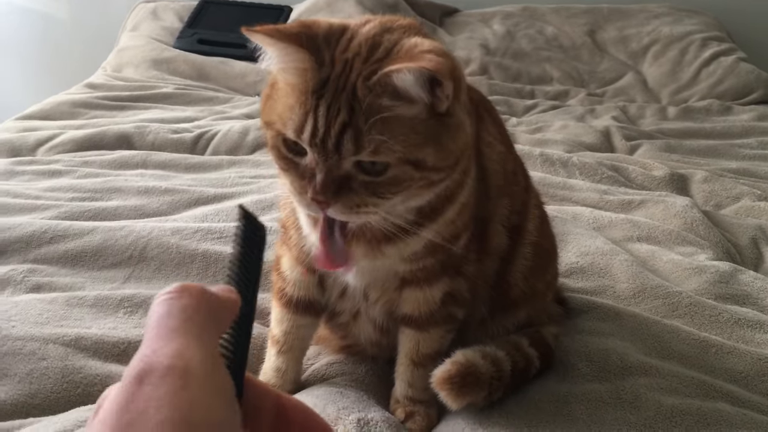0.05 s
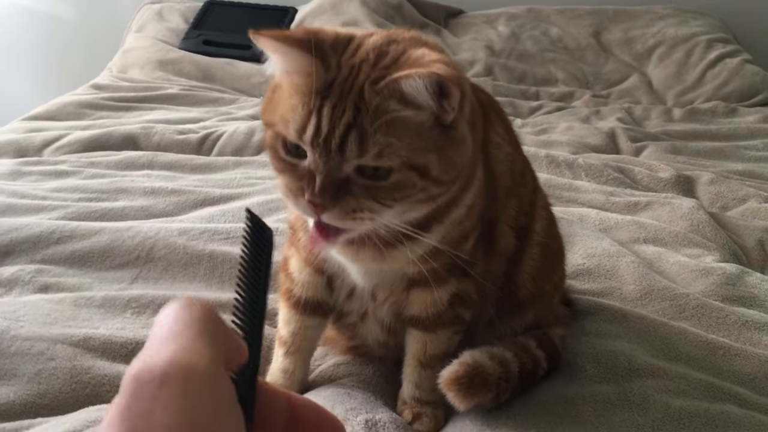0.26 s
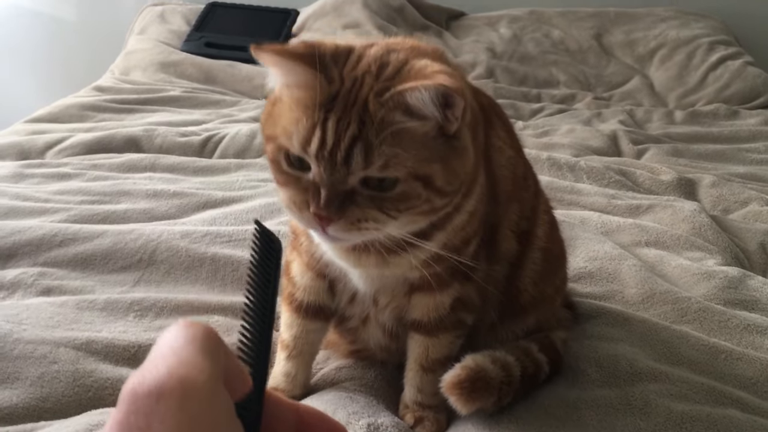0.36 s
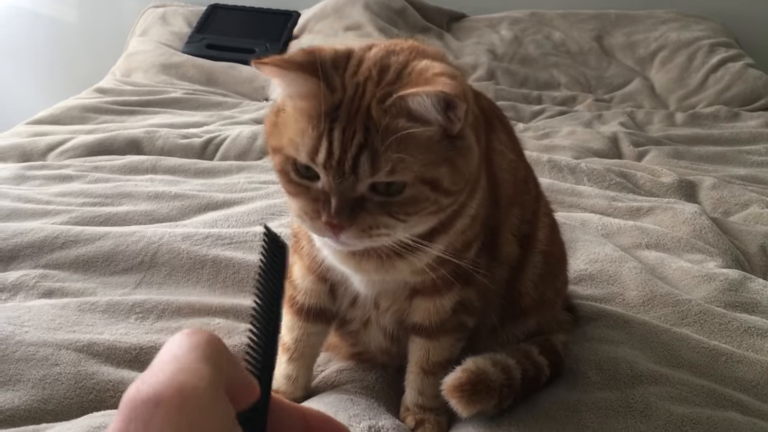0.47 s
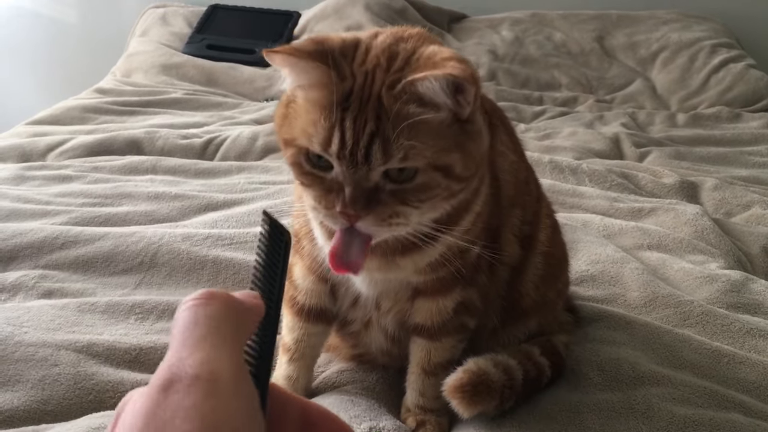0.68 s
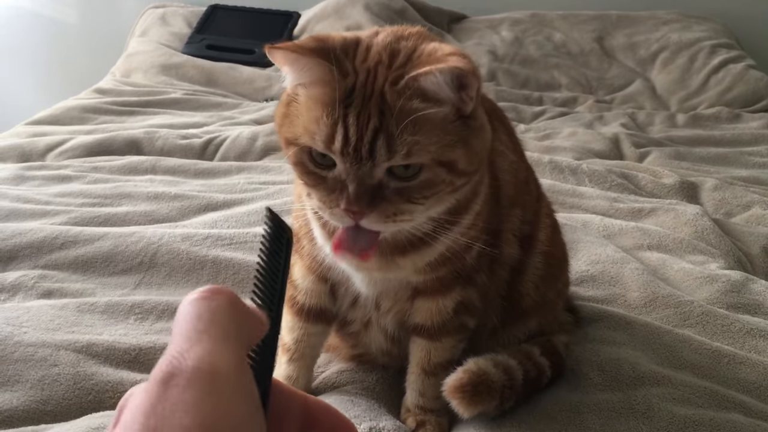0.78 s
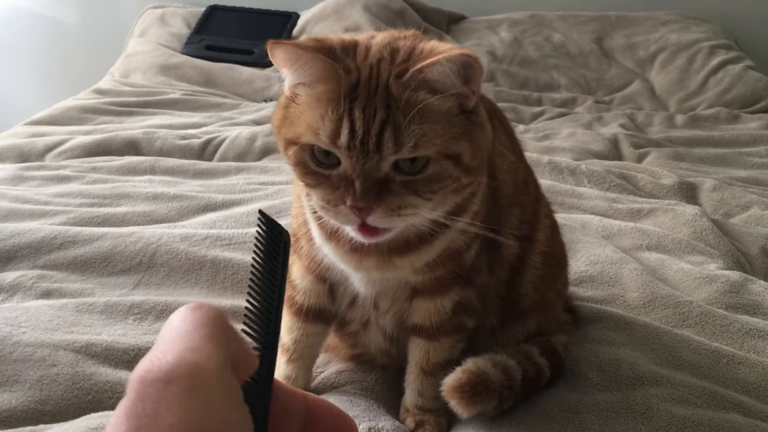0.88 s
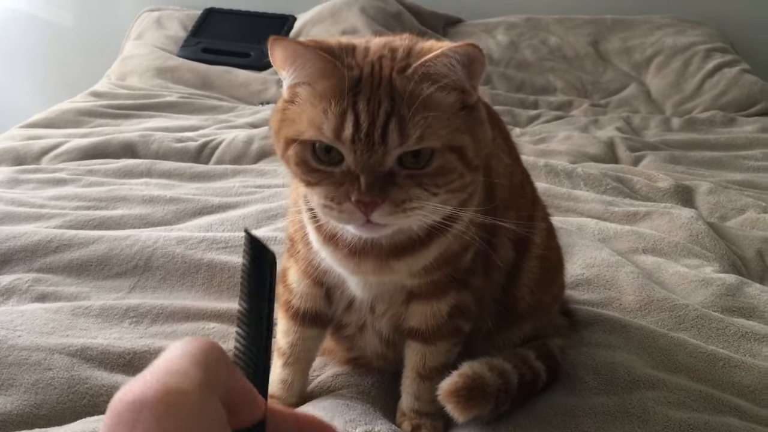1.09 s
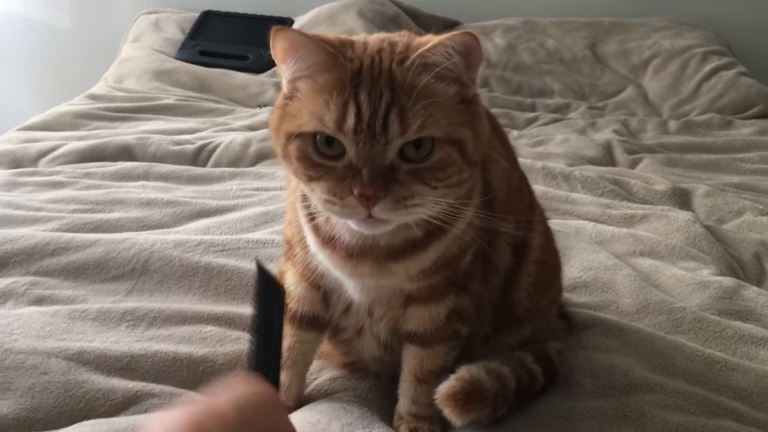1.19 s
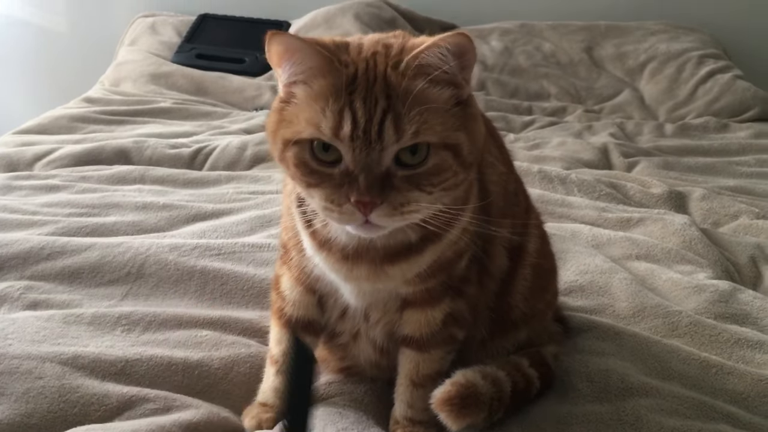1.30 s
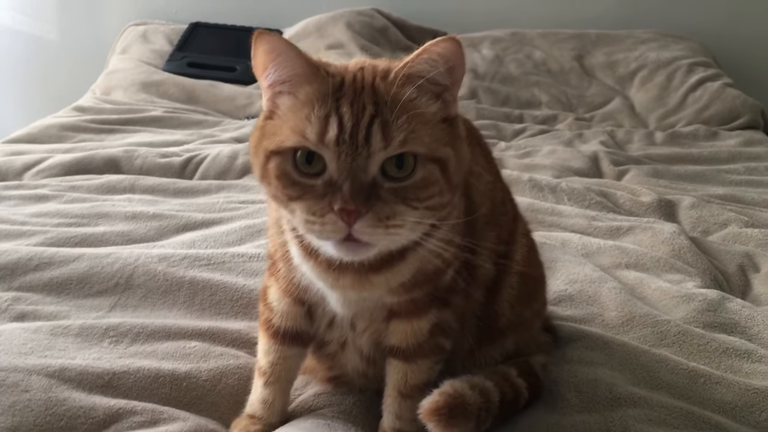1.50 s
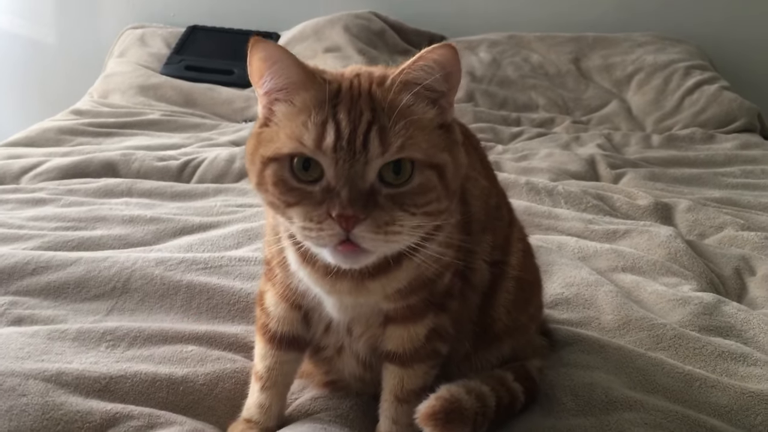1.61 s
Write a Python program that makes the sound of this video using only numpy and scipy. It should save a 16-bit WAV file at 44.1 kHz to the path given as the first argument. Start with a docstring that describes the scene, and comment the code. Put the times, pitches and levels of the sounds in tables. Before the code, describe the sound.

A thumb strums a plastic comb's teeth in two quick runs of sharp clicks.

```python
"""A plastic comb clicks as a thumb drags twice along its teeth, close to a phone in a quiet bedroom.
Each tooth snaps free, rings for a few milliseconds and knocks the comb's spine. The thumbnail ticks
between teeth, and the comb knocks and scuffs in the hand. Walls and ceiling return each click.
The room's air murmurs underneath, and the phone's noise suppressor lets hiss up while the comb sounds."""
import sys
import numpy as np
from scipy import signal
from scipy.fft import rfft, irfft
from scipy.io import wavfile
from scipy.ndimage import uniform_filter1d

SR = 44100
rng = np.random.default_rng(int(sys.argv[2]) if len(sys.argv) > 2 else 0)


def store_wav(level_fs):
    """Save 16-bit WAV to argv[1]."""
    pcm = np.round(np.clip(np.atleast_2d(level_fs), -1, 1) * 32767)
    wavfile.write(sys.argv[1], SR, pcm.T.astype(np.int16))


N = 72765
CONTACT_TIME = np.arange(2048) / SR  # seconds since a touch began
CRACK_DB, CRACK_T60_S = -18, 0.005  # a snap's toneless part; "t60" is the time to fade by 60 dB

# the tones of the comb when held tight: (pitch [Hz], level [dB], fade time [s])
GRIP_TONES = [(2060, 0, .0075), (2950, -2, .005), (4300, -5, .003)]


def undb(db):
    """Turn decibels into a volume multiplier."""
    return 10 ** (np.asarray(db) / 20)


def fade(t, t60):
    """Die away by 60 dB every t60 seconds."""
    return np.exp(-np.log(1000) * t / t60)


def colour(x, points):
    """Turn pitches up or down along a curve of (pitch [Hz], level [dB]) points."""
    hz, db = np.array(points, float).T
    size = 2 * len(x)
    f = np.maximum(np.fft.rfftfreq(size, 1 / SR), 1)
    gain = undb(np.interp(np.log(f), np.log(hz), db))
    return irfft(rfft(x, size) * gain, size)[:len(x)]


def noise(points, db):
    """Steady noise, shaped by the points, with an average level of db."""
    x = colour(rng.standard_normal(N), points)
    return x * undb(db) / x.std()


def add(out, start, x):
    """Mix x into out from the start time in seconds."""
    i = int(start * SR)
    out[i:i + len(x)] += x[:N - i]


def snap(t60):
    """A brief, random chatter of contact, about equally strong at all pitches."""
    burst = rng.standard_normal(len(CONTACT_TIME)) * fade(CONTACT_TIME, t60)
    for _ in range(3):  # even out the pitches, then make it short again
        spectrum = rfft(burst)
        burst = irfft(spectrum / (abs(spectrum) + 1e-9)) * fade(CONTACT_TIME, 4 * t60)
    return burst / np.sqrt(np.sum(burst ** 2))


def ring(tones, push, floor_db=-60, dips=()):
    """A push makes the plastic ring at its own tones, over a toneless floor of sound."""
    size = 4096
    f = np.fft.rfftfreq(size, 1 / SR)
    power = undb(floor_db) ** 2
    for hz, db, t60 in tones:
        strength = undb(db + .8 * rng.standard_normal()) * SR / 2  # no two blows are alike
        pitch = hz * (1 + .015 * rng.standard_normal())
        damping = np.log(1000) / t60
        power += strength ** 2 / (damping ** 2 + (2 * np.pi * (f - pitch)) ** 2)
    for hz, width, depth_db in dips:
        power *= undb(-depth_db * np.exp(-((f - hz) / width) ** 2)) ** 2
    # pack the sound toward its start, like a real blow (minimum phase)
    cepstrum = irfft(np.log(power) / 2)
    cepstrum[1:size // 2] *= 2
    cepstrum[size // 2:] = 0
    return irfft(np.exp(rfft(cepstrum)) * rfft(push, size))


def room_air():
    """The air of the room murmurs, low and steady."""
    # the murmur's shape: (pitch [Hz], relative level [dB])
    murmur = [(25, -29), (40, -10), (58, -4), (100, -3.5), (128, 1), (170, -7.5), (230, -7.5), (330, -14),
              (510, -19.5), (600, -13.5), (720, -26.5), (1100, -28), (2500, -32.5), (4000, -31),
              (8000, -36)]
    return noise(murmur, db=-57.5)


def microphone_hiss(sound):
    """The noise suppressor holds the hiss down, and lets it up for a moment after each loud click."""
    # the hiss's shape: (pitch [Hz], relative level [dB])
    hiss = [(100, -14), (600, 4.5), (1500, 2), (3000, 1.5), (6000, -1.5), (10000, 0.5), (15500, -0.5)]
    trigger_db, shut_db, hold_s, glide_s = -27, -10.5, .335, .02
    index = np.arange(N)
    last_loud = np.maximum.accumulate(np.where(abs(sound) > undb(trigger_db), index, -N))
    is_open = index - last_loud < hold_s * SR
    openness = uniform_filter1d(is_open.astype(float), int(glide_s * SR))
    return noise(hiss, db=-61) * undb(shut_db * (1 - openness))


def bedroom(sound):
    """Walls and ceiling return a few clear echoes and a short wash whose treble dies first."""
    # the first echoes: (delay [s], level [dB])
    echoes = [(.0075, -32), (.0101, -25), (.0112, -25.5), (.0127, -22.5), (.0136, -36), (.0145, -23),
              (.0163, -29.5), (.0179, -23.5)]
    # how the room colours the wash: (pitch [Hz], boost [dB])
    room_colour = [(500, -9), (1300, 0), (1600, 0.5), (2200, -1.5), (3400, -10.5), (4600, -3), (5500, -4.5),
                   (6300, 1), (8200, -5), (10000, 1.5), (12200, -1), (13300, 0.5), (14500, -1.5),
                   (16000, -21)]
    wash_db, onset_s, treble_hz = -12, 0.0075, 9600
    t = np.arange(SR // 2) / SR
    scatter = rng.standard_normal(len(t))
    low = signal.sosfilt(signal.butter(1, treble_hz, fs=SR, output="sos"), scatter)
    wash = low * fade(t, t60=0.4) + (scatter - low) * fade(t, t60=.22)
    wash *= np.clip(2 * t / onset_s - 1, 0, 1)
    response = colour(wash * undb(wash_db) / np.sqrt(np.sum(wash ** 2)), room_colour)
    for delay, db in echoes:
        response[int(delay * SR)] += undb(db)
    return signal.fftconvolve(sound, response)[:N]


def grip_rubs():
    """The comb slides in the hand, and a swell of friction makes it ring."""
    # the slides: (time [s], length [s], level [dB])
    rubs = [(0.58, 0.013, -51.5), (1.223, 0.028, -61.5), (1.259, 0.021, -62)]
    out = np.zeros(N)
    for start, length, db in rubs:
        swell = np.sin(np.pi * np.clip(CONTACT_TIME / length, 0, 1))
        friction = ring(GRIP_TONES, rng.standard_normal(len(swell)) * swell)
        average = np.sqrt(np.sum(friction ** 2) / (length * SR))
        add(out, start, undb(db) * friction / average)
    return out


def grip_knocks():
    """The comb knocks softly as it shifts in the hand."""
    # the knocks: (time [s], level [dB])
    knocks = [(.5843, -35), (.5856, -36), (1.2452, -43.5)]
    out = np.zeros(N)
    for start, db in knocks:
        add(out, start, undb(db) * ring(GRIP_TONES, snap(CRACK_T60_S)))
    return out


def comb_tones(treble_db, top_db):
    """The whole comb's tones; a sharper release makes the high ones stronger."""
    # the comb's natural tones: (pitch [Hz], level [dB], fade time [s])
    tones = [(1220, -43.5, 0.0089), (2236, -40.5, 0.0061), (3170, -37, 0.0051), (4270, -33.5, 0.0045),
             (5160, -29.5, 0.003), (6640, -30, 0.0039), (8100, -29, 0.0031), (9630, -33, 0.0056),
             (11170, -31.5, 0.0039), (12880, -29.5, 0.0042), (14500, -29.5, 0.0039), (15760, -30, 0.003)]
    corners_hz, boosts_db = [4400, 8800, 13000], [0, treble_db, top_db]
    return [(hz, db + np.interp(hz, corners_hz, boosts_db), t60) for hz, db, t60 in tones]


def light_ticks():
    """A very faint, bright tick sounds before the strokes begin; the later ticks are the nail tapping lightly
    on the teeth and ringing the comb."""
    # the ticks: (time [s], relative level [dB], top treble boost [dB]); the first is a faint, bright tick, the
    # rest are nail taps
    ticks = [(0.132, -30.5, 9), (0.1461, -33, -4), (0.1832, -20.5, -18), (0.2243, -30, -5),
             (0.2683, -16, -11), (0.5753, -11, -17), (0.812, -15.5, -4.0), (0.837, -18, -2),
             (0.8426, -15.5, -10.0), (0.8516, -21, -2), (1.262, -23.5, -3), (1.2717, -23.0, -3),
             (1.3426, -27, 0)]
    out = np.zeros(N)
    for start, db, top_db in ticks:
        tick = ring(comb_tones(top_db / 2, top_db), snap(t60=0.0083), CRACK_DB)
        add(out, start, undb(db + 5.5) * tick)
    return out


def tooth_snaps():
    """Each tooth snaps free, rings, knocks the spine and sets the whole comb ringing."""
    # one row per snap: (time [s], level [dB], spine pitch [Hz], bending pitch [Hz], bending boost [dB],
    # tooth pitch [Hz], tooth boost [dB], overtone pitch [Hz], treble boost [dB], top treble boost [dB])
    plucks = [(0.1998, -16, 1520, 3360, 9, 6250, -13, 13300, 2, 2.5),
              (0.2264, -1.1, 1580, 3780, 3, 7030, 3.5, 15600, -1, 2),
              (0.2709, -1.5, 1550, 3770, -0.5, 6770, 4.5, 13400, -19, 2),
              (0.31, 0.5, 1570, 3450, 2.5, 6430, 5.5, 12800, -15, 4.5),
              (0.3388, -1, 1590, 3640, -1, 5630, 7.5, 12400, -12, 2.5),
              (0.3609, 0.1, 1500, 3500, 4, 5650, 4.5, 13500, 0.5, 4),
              (0.4033, 1.1, 1510, 3540, 0.5, 5600, 5, 12500, -8, 3),
              (0.4532, 0.4, 1470, 3650, 2.5, 5530, 9.5, 13600, 2, 6.5),
              (0.491, 2, 1430, 3600, -1.5, 5400, 3, 14800, -1.5, 4.5),
              (0.5579, -1, 1380, 3450, -18, 6600, 4, 14500, 2, 6.5),
              (0.8289, -17, 1500, 3450, 8, 6350, -4, 13200, 6, 3),
              (0.8535, -3.5, 1490, 3730, -1.5, 7280, -17, 13500, -3, 3.5),
              (0.8917, -0.6, 1530, 3870, 0.5, 6600, 5.5, 13200, -26, 3),
              (0.9131, 0.2, 1610, 3080, 5, 6300, 4, 13140, -10, 3),
              (0.9463, 1, 1590, 3580, 3, 6450, -13, 13300, 0.5, 3),
              (0.9714, 2.5, 1500, 3550, 1.5, 8270, 6, 13100, -0.5, 4),
              (1.0042, 3.5, 1480, 3360, -1.5, 5700, 2, 12900, -9, 2.5),
              (1.0289, 1.6, 1500, 3970, -1, 8400, 2, 13450, 5, 6),
              (1.0582, 2.5, 1330, 3750, -4, 8250, 1.5, 13200, -2, 2.5),
              (1.087, 0.5, 1320, 3780, -9, 5400, 8, 13500, 3.5, 4),
              (1.1087, 2, 1440, 3530, -4, 5400, 7.5, 13700, -1, 3.5),
              (1.1259, 0, 1410, 3600, 0, 5870, 8, 13900, 2.5, 6.5)]
    # gaps where neighbouring tones cancel: (pitch [Hz], width [Hz], depth [dB])
    dips = [(1850, 160, 4), (2700, 220, 5), (4500, 350, 4), (10400, 400, 3)]
    out = np.zeros(N)
    for start, db, spine_hz, bend_hz, bend_db, tooth_hz, tooth_db, over_hz, treble_db, top_db in plucks:
        # (pitch [Hz], level [dB], fade time [s])
        own_tones = [(spine_hz, -36.5, .0135), (bend_hz, bend_db - 29, .0045),
                     (tooth_hz, tooth_db - 30.5, .0042), (over_hz, top_db - 25, .0038)]
        click = ring(comb_tones(treble_db, top_db) + own_tones, snap(CRACK_T60_S), CRACK_DB, dips)
        add(out, start, undb(db) * click)
    return out


def scene():
    """The comb, with its bass cut away, and its echoes over the murmur of the room."""
    comb = tooth_snaps() + light_ticks() + grip_knocks() + grip_rubs()
    comb = signal.sosfilt(signal.butter(2, 1010, "high", fs=SR, output="sos"), comb)
    return (comb + bedroom(comb) + room_air())[None]


def record(dry):
    """The phone adds its hiss and cuts everything above 16100 Hz."""
    top_cut = signal.ellip(8, .2, 70, 16100, fs=SR, output="sos")
    return signal.sosfilt(top_cut, dry + microphone_hiss(dry[0]))


dry = scene()
out = record(dry)
store_wav(out)
```